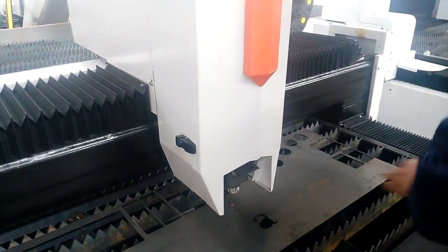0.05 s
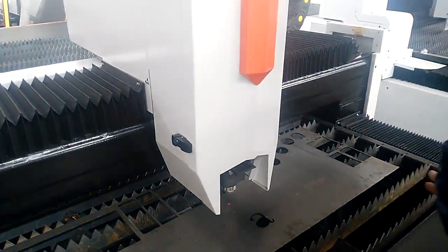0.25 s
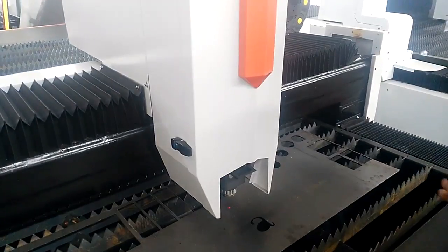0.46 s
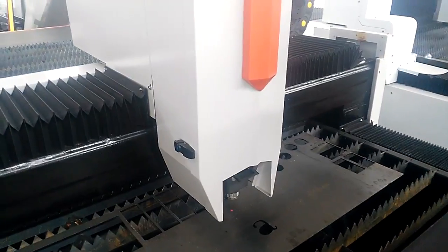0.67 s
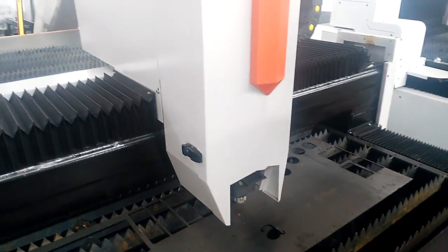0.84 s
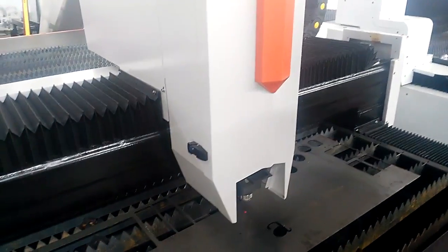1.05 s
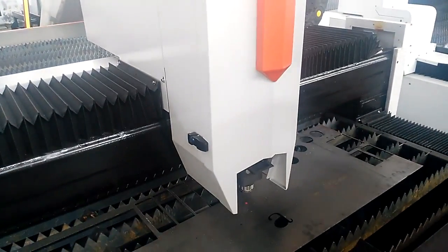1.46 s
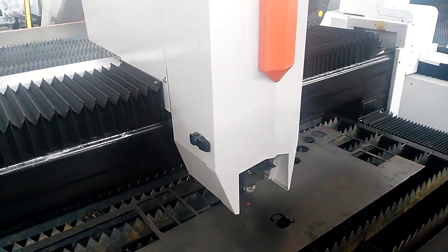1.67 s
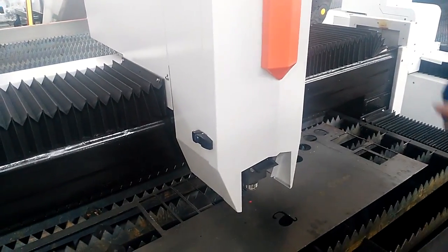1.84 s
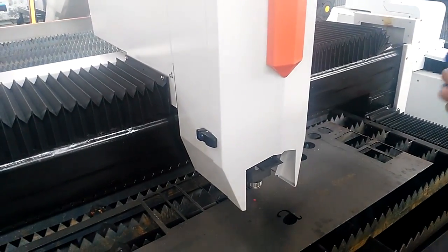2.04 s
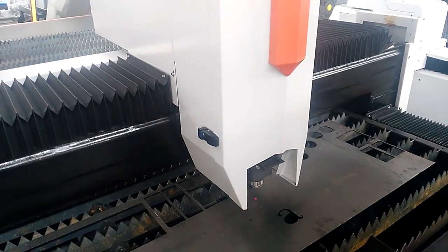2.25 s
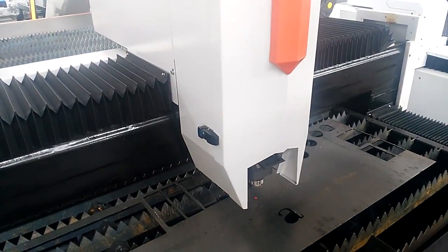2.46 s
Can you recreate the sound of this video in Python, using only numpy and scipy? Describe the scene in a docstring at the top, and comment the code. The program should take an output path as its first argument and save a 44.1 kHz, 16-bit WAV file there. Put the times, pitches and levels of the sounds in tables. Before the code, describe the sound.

A sharp bang of sheet steel rings out in a workshop hall, followed by a lighter rattling hit as it settles. Machinery hums quietly throughout, and soft handling thuds reach the hand-held microphone afterwards.

```python
"""Steel sheet knocked in a workshop

A steel sheet is knocked on a cutting machine's bed: a sharp bang, a weaker clattering hit and a
soft settling. Each contact rings the sheet's modes, and the hall carries the crash on. Dull handling
bumps reach the hand-held microphone. Behind it a machine hums and whines and something squeaks faintly."""
import sys
import numpy as np
from scipy import signal
from scipy.fft import rfft, irfft
from scipy.io import wavfile

SR = 44100
rng = np.random.default_rng(int(sys.argv[2]) if len(sys.argv) > 2 else 0)


def wrap_up_sound(samples):
    """Save the sound to the file named by the first command line argument, as 16-bit audio."""
    columns = np.atleast_2d(samples).T
    # keep every value between -1 and 1, then stretch to whole-number steps
    tamed = np.clip(columns, -1, 1)
    steps = np.round(tamed * 32767).astype(np.int16)
    wavfile.write(sys.argv[1], SR, steps)


N = 110250
T = np.arange(N) / SR
HZ = np.maximum(np.arange(N // 2 + 1) * SR / N, 1)


# Bang, clatter, settle: start_s, level_db, extra_bass_db, extra_clang_db, extra_treble_db
KNOCKS = [(.2355, -2, -4, 1, -4), (0.2441, 0, 1.5, -2, 0), (.274, -12, 3, 2.5, -0.5),
          (0.4231, -9, -14, 6, -2), (.437, -10.5, -8, -0.5, -20.5), (.453, -10.5, 0.5, 3, -18),
          (.531, -16.5, -1.5, 6, -16), (.553, -18.5, 0, 3, -11), (.574, -17, 0, 3.5, -13),
          (0.63, -24.5, 4.5, 5.5, -17.5), (.680, -24.5, 7, -5, -20)]

def knocks(hz):
    """The sheet hits the bed: one click per contact, as strong as that contact is at this frequency."""
    start_s, level_db, bass_db, clang_db, treble_db = np.transpose(KNOCKS)
    bass_hz, clang_hz, clang_octaves, treble_hz = 200, 1380, 0.54, 2600
    bass = 1 / (1 + (hz / bass_hz) ** 2)
    clang = np.exp(-.5 * (np.log2(hz / clang_hz) / clang_octaves) ** 2)
    treble = 1 / (1 + (treble_hz / hz) ** 2)
    strength = from_db(level_db + bass_db * bass + clang_db * clang + treble_db * treble)
    clicks = np.zeros(N)
    clicks[(start_s * SR).astype(int)] = strength
    return clicks + 1e-18


# The pitched ring of the steel: pitch_hz, gain_db, t60_s
SHEET_MODES = [(123.7, -19, 0.17), (112.8, -30, 1), (164, -39, 0.82), (214.6, -40, .9), (242.5, -39, 0.93),
               (260.7, -37.5, 0.78), (300, -28, 0.35), (358.4, -46, .9), (389.3, -40, 0.3), (505, -51, 0.5),
               (600, -48.5, .4), (628, -45.5, 0.23), (846, -48, 0.14), (895, -45.5, 0.13), (996, -54, 0.17),
               (1350, -60.5, 0.58), (1393, -60, 0.65), (1623, -55, .3), (2750, -55.5, 0.093)]

def sheet_ring():
    """Every contact rings the sheet's strongest modes, with little deep bass and no sharp edge."""
    ring = 0
    for hz, gain_db, t60_s in SHEET_MODES:
        decay, angle = from_db(-60 / (t60_s * SR)), 2 * np.pi * hz / SR
        mode = signal.lfilter([0, np.sin(angle)], [1, -2 * decay * np.cos(angle), decay ** 2], knocks(hz))
        ring -= from_db(gain_db) * mode
    ring = signal.sosfilt(signal.butter(2, 82, "highpass", fs=SR, output="sos"), ring)
    return signal.sosfilt(signal.butter(8, 3000, "lowpass", fs=SR, output="sos"), ring)


# Tone colour of the crash: frequency_hz, relative_density_db
CRASH_COLOUR = [(60, -25), (100, -12.5), (170, 1), (330, -4), (450, -12), (650, -9.5), (900, -13),
                (1150, -21), (1600, -24), (2100, -31), (2900, -35), (3500, -50), (4400, -51), (5200, -42.5),
                (6300, -50.5), (9000, -51.5), (15000, -63)]
# How fast it dies in the steel: frequency_hz, t60_s
CRASH_DECAY = [(100, 0.57), (400, 0.12), (1500, 0.26), (3000, 0.28), (6000, 0.074), (15000, .11)]
# Length of the hall's tail: frequency_hz, t60_s
HALL_DECAY = [(100, 1.7), (400, 1.2), (1000, 0.85), (2500, 1.3), (8000, 1.3)]
# How much of the crash feeds the hall: frequency_hz, send_db
HALL_SEND = [(100, -15), (300, -9), (600, -14), (2000, -22), (8000, -13)]

def sheet_crash():
    """Countless close modes blur into noise and die quickly; the hall carries them on."""
    crash = 0
    for hz, band in noise_bands(CRASH_COLOUR):
        power = knocks(hz) ** 2
        direct = linger(power, rise_s=0.00079, t60_s=at_hz(CRASH_DECAY, hz))
        hall = linger(power, rise_s=0.021, t60_s=at_hz(HALL_DECAY, hz))
        send = from_db(at_hz(HALL_SEND, hz))
        crash += band * np.sqrt(direct + hall * send ** 2)
    return from_db(-52) * crash


# Bumps on the microphone's case: centre_s, peak_db, half_width_ms
BUMPS = [(0.036, -41, 13.4), (0.697, -37.5, 2.2), (0.903, -29.5, 5.2), (1.13, -32.5, 4.9), (1.208, -37, 10),
         (1.225, -40, 3.3), (1.318, -28, 2.8), (1.444, -31.5, 4.2), (1.464, -38, 2.7), (1.5002, -28, 2.6),
         (1.6312, -19.5, 2.63), (1.662, -23.5, 2.08), (1.720, -22.5, 2.02), (1.748, -21.5, 2.95),
         (1.778, -30.5, 7.5), (1.8985, -21, 1.9), (2.119, -39, 4.1), (2.148, -38, 10.4),
         (2.393, -36.5, 4.4)]
# Boom of the case and grip: pitch_hz, q
CASE_RESONANCES = [(118.4, 1.35), (56.8, 4.23)]

def handling_bumps():
    """Soft pushes on the microphone's case, each a short thud that sinks in pitch."""
    out = np.zeros(N + SR)
    t = np.arange(SR // 3) / SR - .03
    case = [signal.bilinear([1, 0, 0], [1, 2 * np.pi * hz / q, (2 * np.pi * hz) ** 2], SR)
            for hz, q in CASE_RESONANCES]
    lag_hz = 163   # lows below this arrive late
    allpass = signal.bilinear([-1, 2 * np.pi * lag_hz], [1, 2 * np.pi * lag_hz], SR)
    for centre_s, peak_db, half_width_ms in BUMPS:
        push = 1 / (1 + (t * 1000 / half_width_ms) ** 2)
        thud = push - push[0]
        for b, a in case + [allpass]:
            thud = signal.lfilter(b, a, thud)
        start = max(int((centre_s + t[0]) * SR), 0)
        out[start:start + len(t)] += from_db(peak_db) * thud / np.abs(thud).max()
    return out[:N]


# The machine's hum: pitch_hz, width_hz, base_level_db
HUM_TONES = [(258.7, 18, -67), (922, 6.1, -91)]
# Swells and dips of its whine: time_s, gain_db
WHINE_FADER = [(0, 3), (.7, 2), (1.15, 5.5), (1.3, -5), (1.6, -10.5), (1.7, 3.5), (2.1, 6), (2.25, -6),
               (2.5, -4)]

def machine():
    """A wavering hum that rides the workshop's midrange fader, under a thin, high whine."""
    hum = sum(from_db(db) * wavering_tone(hz, width_hz) for hz, width_hz, db in HUM_TONES)
    whine = from_db(-90.5) * wavering_tone(hz=2714, width_hz=45)
    return hum * fader(MIDRANGE_FADER) + whine * fader(WHINE_FADER)


# Faint squeaks: start_s, length_s, pitch_hz, level_db
SQUEAKS = [(1.75, 0.12, 687, -64.5), (1.863, 0.16, 644, -72), (1.915, 0.152, 672, -72)]

def squeaks():
    """Short, nearly pure tones that fade in and out with a slightly unsteady pitch."""
    fade_s, waver_hz = 0.039, 3
    out = 0
    for start_s, length_s, pitch_hz, level_db in SQUEAKS:
        swell = np.clip(np.minimum(T - start_s, start_s + length_s - T) / fade_s, 0, 1)
        phase = 2 * np.pi * np.cumsum(pitch_hz + waver_hz * drift(15)) / SR
        out += from_db(level_db) * swell * np.sin(phase)
    return out


# Colour of the workshop's room tone: frequency_hz, relative_density_db
ROOM_COLOUR = [(20, -32.5), (30, -14), (43, 8), (70, -6), (120, -8), (180, -14), (260, -18), (340, -25.5),
               (500, -30.5), (850, -35), (1200, -43), (2000, -44.5), (2700, -47), (3500, -49.5),
               (7000, -54), (11000, -58), (15000, -65)]
# Level rides on its low, middle and high bands: time_s, gain_db
RUMBLE_FADER = [(0, 2.5), (.17, -4.5), (.5, -0.5), (.85, 1), (1.25, 5), (1.58, -1), (1.8, -1), (2.0, 0),
                (2.27, -3), (2.5, -3.5)]
MIDRANGE_FADER = [(0, 7), (.22, 3.5), (1.0, -2), (1.45, -2.5), (1.68, 0.5), (2.0, -0.5), (2.5, 0.5)]
HISS_FADER = [(0, 2), (.25, 1), (.9, 0), (1.55, 0), (1.68, 0.5), (1.95, -0.5), (2.2, -0.5), (2.5, 0)]

def room_tone():
    """The workshop's background noise: uneven rumble, a midrange wash and near-steady hiss."""
    low_hz, high_hz, waver_db = 130, 2140, 2
    spectrum = from_db(-68) * noise_spectrum(ROOM_COLOUR)
    rumble = irfft(spectrum * (HZ < low_hz), N) * from_db(waver_db * drift(1.3))
    midrange = irfft(spectrum * (HZ >= low_hz) * (HZ < high_hz), N)
    hiss = irfft(spectrum * (HZ >= high_hz), N)
    return rumble * fader(RUMBLE_FADER) + midrange * fader(MIDRANGE_FADER) + hiss * fader(HISS_FADER)


def linger(power, rise_s, t60_s):
    """Energy that builds up after each knock and dies away."""
    fall, rise = from_db(-120 / (t60_s * SR)), np.exp(-1 / (rise_s * SR))
    tail = signal.lfilter([1], [1, -fall], power)
    return signal.lfilter([1 - rise], [1, -rise], tail)


def noise_spectrum(colour):
    """Spectrum of a noise whose power per Hz follows the colour curve."""
    return rfft(rng.standard_normal(N)) * from_db(at_hz(colour, HZ)) * np.sqrt(SR / 2)


def noise_bands(colour):
    """Coloured noise in half-octave bands, each with its centre frequency."""
    edges_hz = 62 * 2 ** (np.arange(17) / 2)
    spectrum = noise_spectrum(colour)
    for low, high in zip(edges_hz, edges_hz[1:]):
        yield np.sqrt(low * high), irfft(spectrum * ((HZ >= low) & (HZ < high)), N)


def wavering_tone(hz, width_hz):
    """A tone whose strength and phase wander."""
    phase = 2 * np.pi * hz * T
    return drift(width_hz / 2) * np.sin(phase) + drift(width_hz / 2) * np.cos(phase)


def drift(rate_hz):
    """Slow random motion with a spread of 1."""
    hop, warm_up = 40, 2000
    pole = np.exp(-2 * np.pi * rate_hz * hop / SR)
    noise = rng.standard_normal(N // hop + warm_up + 2)
    slow = signal.lfilter([1], [1, -2 * pole, pole ** 2], noise)[warm_up:]
    return np.interp(np.arange(N) / hop, np.arange(len(slow)), slow / slow.std())


def fader(curve):
    """Gain along a curve of time_s, gain_db."""
    return from_db(np.interp(T, *np.transpose(curve)))


def at_hz(curve, hz):
    """Read a curve on a log-frequency axis."""
    frequencies, values = np.transpose(curve)
    return np.interp(np.log(hz), np.log(frequencies), values)


def from_db(db):
    """Decibels to gain."""
    return 10 ** (np.asarray(db) / 20)


def scene():
    """The sheet, the bumps and the workshop behind them, in mono."""
    sheet = sheet_ring() + sheet_crash()
    background = room_tone() + machine() + squeaks()
    return (sheet + handling_bumps() + background)[None]


def record(dry):
    """A steep low-pass takes off the very top."""
    cutoff_hz = 15750
    return signal.sosfilt(signal.ellip(12, .1, 80, cutoff_hz, fs=SR, output="sos"), dry)


dry = scene()
out = record(dry)
wrap_up_sound(out)
```